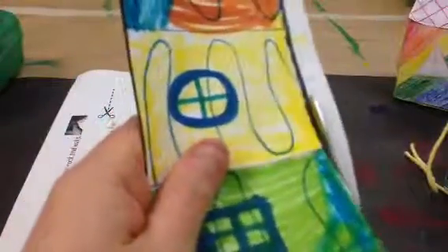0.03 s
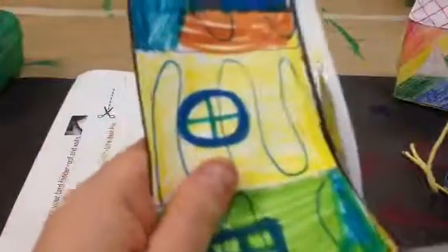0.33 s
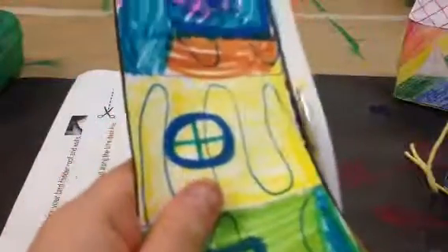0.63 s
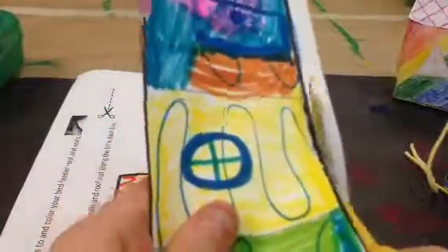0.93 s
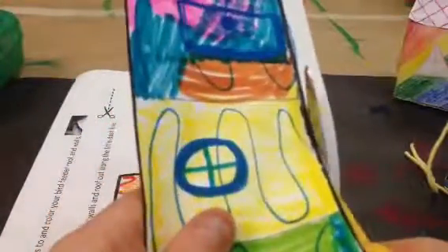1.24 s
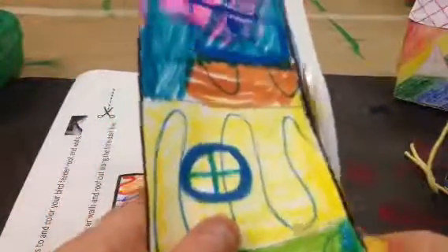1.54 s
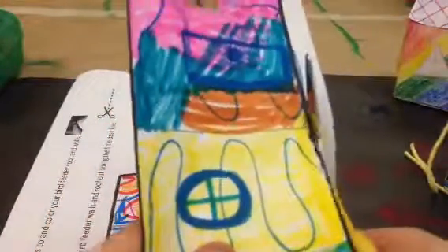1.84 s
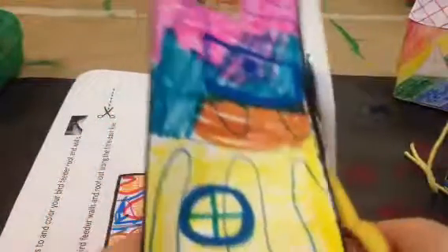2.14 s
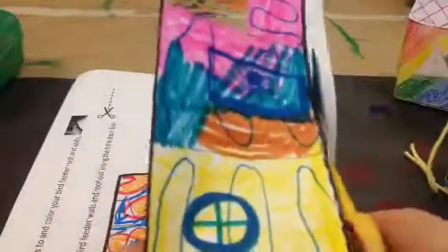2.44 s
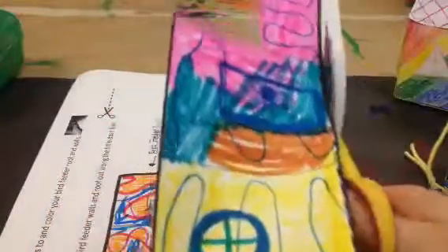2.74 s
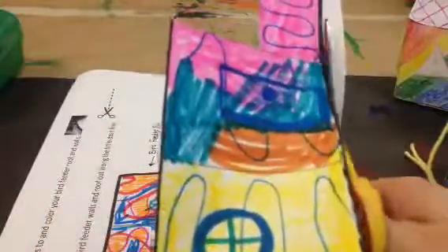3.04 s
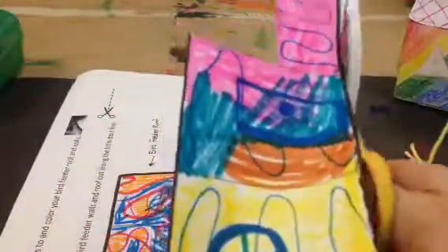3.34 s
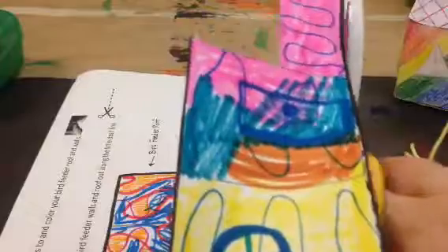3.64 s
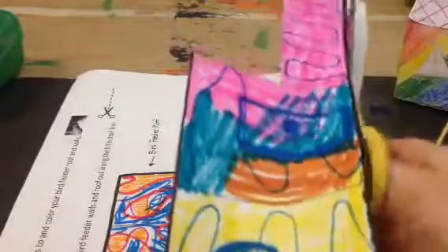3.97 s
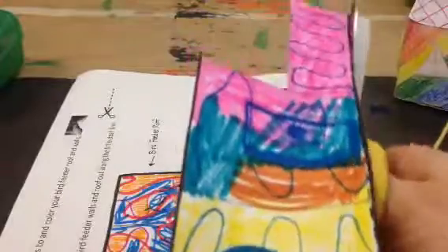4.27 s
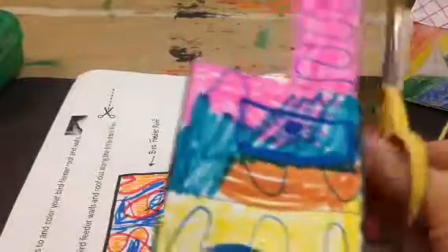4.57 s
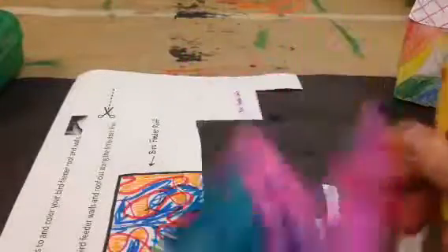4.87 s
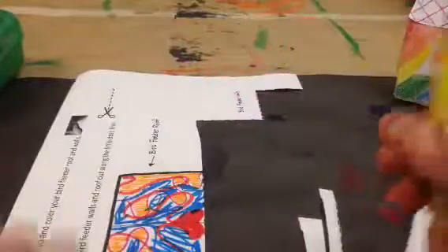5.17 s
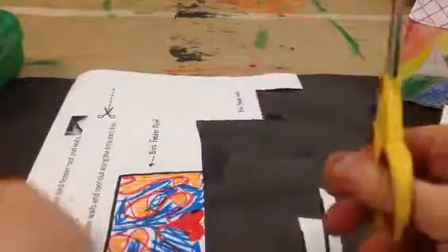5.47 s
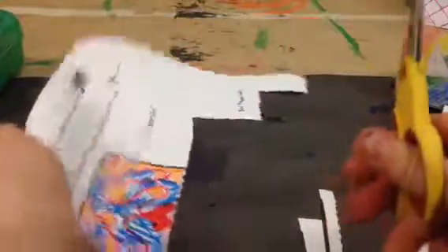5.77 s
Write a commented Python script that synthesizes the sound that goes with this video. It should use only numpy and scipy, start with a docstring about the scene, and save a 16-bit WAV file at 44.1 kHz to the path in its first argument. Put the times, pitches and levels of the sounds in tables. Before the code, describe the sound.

Scissors cut through stiff drawing paper, close by, in a small quiet room with a faint low rumble. The cutting starts immediately. Short, crisp, crunchy bites come at about 0, 0.7, 1.4, 1.9, 2.5, 3.1, 3.7 and 4.3 seconds, many with sharp little snaps as the fibres give way. Between them the blades open and slide along the cut edge with a finer, softer scrape. The sheet ticks and pops as it bends, most clearly around 0.3 and 1.5 seconds. At 4 seconds one blade drags with a brief, high rasp. From about 4.5 seconds the sheet is laid aside with a soft rustle that swells toward 5 seconds, with a few small ticks. A loose edge lightly flicks the table at 5.2 seconds. From 5.6 seconds another sheet is picked up, rustling to the end, with one sharp tick at 5.8 seconds.

```python
"""Scissors cut along a sheet of drawing paper, close by, in a small quiet room.
Each closing stroke breaks a dense run of fibres, and the larger catches let go with a snap.
Between strokes the blades open and slide along the cut edge; the stiff sheet pops and ticks as it bends.
Near 4 seconds one blade drags and rasps. After the last cut the sheet is laid aside with a rustle,
a loose edge flicks the table, and another sheet is picked up."""
import sys
import numpy as np
from scipy import signal
from scipy.fft import rfft, irfft, next_fast_len
from scipy.io import wavfile
from scipy.ndimage import uniform_filter1d, map_coordinates

SR = 44100
rng = np.random.default_rng(int(sys.argv[2]) if len(sys.argv) > 2 else 0)


def int16_out(signal):
    """Quantize to a 16-bit WAV file."""
    q = np.round(np.clip(np.atleast_2d(signal).T, -1, 1) * 32767)
    wavfile.write(sys.argv[1], SR, q.astype(np.int16))


N = 264908  # about 6 seconds

# A sound's "body" is its low part and its "fizz" its highest; stroke() explains swell and arch.
# the blades open and slide: (start [s], length [s], level [dB], swell [dB], arch [dB], body [dB])
SLIDE_STROKES = [(0.245, 0.14, -39, 4, 5, -8.5), (0.454, 0.064, -52, 4, 1, -6),
                 (0.969, 0.15, -44.5, -6, 0.5, -8.5), (1.617, .11, -35, 14.5, 9.5, -10.5),
                 (2.16, 0.17, -46, 10.5, 2.5, -9), (2.735, .13, -41, 13.5, 2.5, -10.5),
                 (3.317, 0.13, -40.5, 13, 8.5, -9.5), (3.497, 0.092, -55.5, 10, 6, -15.5),
                 (3.948, 0.15, -38.5, -7.5, 8.5, -10)]
# the tone of a paper snap: (frequency [Hz], level [dB])
SNAP_TONE = [(88, -58), (150, -23), (462, -21), (1980, -6), (2860, 2), (3550, -3), (4390, 3.5),
             (5870, -14.5), (6730, -26), (7560, -45), (8490, -40.5), (11600, -49), (15500, -67)]


def amp(db):
    """Turn decibels into a number to multiply by."""
    return 10 ** (np.asarray(db) / 20)


def unit(x):
    """Scale a sound to an average strength (rms) of 1."""
    return x / np.sqrt(np.mean(x ** 2) + 1e-20)


def curve_at(points, hz):
    """Read between (frequency, value) points, giving each octave equal room."""
    freqs, values = np.transpose(points)
    return np.interp(np.log(hz + 1), np.log(freqs + 1), values)


def wobble(rate):
    """A smooth curve through `rate` random values a second."""
    values = rng.standard_normal(int(N * rate / SR) + 4)
    return map_coordinates(values, [np.arange(N) * rate / SR])


def filtered(x, response):
    """Multiply each frequency in a sound by response(frequency)."""
    size = next_fast_len(len(x) + SR // 4)
    return irfft(rfft(x, size) * response(np.fft.rfftfreq(size, 1 / SR)), size)[:len(x)]


def impulse(tone, size=2048):
    """The sharpest click that has the given tone."""
    cepstrum = irfft(np.log(amp(curve_at(tone, np.fft.rfftfreq(size, 1 / SR)))))
    # folding the second half onto the first packs the energy at the click's start
    cepstrum[1:size // 2] *= 2
    cepstrum[size // 2 + 1:] = 0
    return irfft(np.exp(rfft(cepstrum)))


def ringing(x, ring_db):
    """The blades and the sheet they grip ring along with a sound."""
    # their resonances: (frequency [Hz], width [Hz], relative level [dB])
    resonances = [(1070, 320, -3.5), (2827, 160, -2), (3380, 62, 2.5), (4400, 330, 0.5)]
    def ring(f):
        return sum(amp(db) * 1j * f * width / (hz * hz - f * f + 1j * f * width)
                   for hz, width, db in resonances)
    return filtered(x, lambda f: 1 + amp(ring_db) * ring(f))


def bands(x):
    """Split a sound into body (below 1600 Hz), crisp middle and fizz (above 7000 Hz)."""
    body = filtered(x, lambda f: 1 / (1 + (f / 1600) ** 8))
    fizz = filtered(x, lambda f: 1 - 1 / (1 + (f / 7000) ** 14))
    return body, x - body - fizz, fizz


def crackle(tone, breaks_per_s, spread_db, hiss, patchy_db, ring_db):
    """Tiny breaks of uneven size and spacing over the hiss of rubbing."""
    count = int(N / SR * breaks_per_s)
    positions = (np.arange(count) + rng.uniform(0, 2, count)) * SR / breaks_per_s
    sizes = amp(spread_db * np.clip(rng.standard_normal(count), -2, 2))
    breaks = np.bincount(positions.astype(int), sizes, N)[:N]
    bursts = signal.lfilter([1], [1, -np.exp(-1 / (SR * 0.00063))], breaks)  # each break fades fast
    grains = unit(bursts * rng.standard_normal(N)) + hiss * rng.standard_normal(N)
    # the bent sheet favours different narrow bands from moment to moment
    spectra = signal.stft(grains, nperseg=512)[2]
    patches = uniform_filter1d(rng.standard_normal(spectra.shape), size=2, axis=0)
    patches = uniform_filter1d(patches, size=10, axis=1)
    grains = signal.istft(spectra * amp(patchy_db * unit(patches)), nperseg=512)[1][:N]
    return ringing(signal.fftconvolve(grains, impulse(tone))[:N], ring_db)


def click(tone, flutter, fade_s, size=4096):
    """A sharp release, then a flutter of the paper that falls 60 dB in fade_s."""
    t = np.arange(size) / SR
    motion = flutter * unit(rng.standard_normal(size) * amp(-60 * t / fade_s)) / np.sqrt(size)
    motion[0] += 1
    return signal.fftconvolve(motion, impulse(tone))[:size]


def add(track, start, sound, db):
    """Mix a sound in at start [s]; db is the level it would have if packed into 4 ms."""
    part = track[max(round(start * SR), 0):][:len(sound)]
    part += amp(db) * sound[:len(part)] * np.sqrt(SR / 250) / np.linalg.norm(sound)


def stroke(start, length, level_db, swell_db, arch_db, attack_s, fade_db_per_s):
    """Gain and progress (0-1) of one stroke: it takes hold, follows the hand's pressure, dies away."""
    t = np.arange(N) / SR - start
    progress = np.clip(t / length, 0, 1)
    # swell is the rise from start to end; arch is how far both ends lie below the middle
    pressure_db = swell_db * (progress - .5) - arch_db * (2 * progress - 1) ** 2
    fade_db = fade_db_per_s * np.maximum(t - length, 0)
    grip = np.clip(t / attack_s, 0, 1) ** 2
    return grip * amp(level_db + pressure_db - fade_db), progress


def background():
    """Low room rumble and faint hiss, there from the start."""
    # the tone of the quiet room: (frequency [Hz], relative level [dB])
    quiet_tone = [(15, -48), (25, -24), (48, -14), (73, -5), (119, -3), (198, -5.5), (300, -12.5),
                  (480, -19.5), (800, -24.5), (1500, -25.5), (2900, -17.5), (4400, -18.5), (7000, -25),
                  (15500, -28.5)]
    return amp(-61.5) * unit(filtered(rng.standard_normal(N), lambda f: amp(curve_at(quiet_tone, f))))


def cutting():
    """The closing blades catch and break fibres in quick uneven clumps."""
    # bites of the blades, one or more to a cut:
    # (start [s], length [s], level [dB], swell [dB], arch [dB], body [dB], fizz [dB])
    bites = [(0, 0.071, -30, 2.5, -1, -12, -27), (0.095, 0.03, -32.5, -2, 3.5, -5, -22),
             (0.633, 0.039, -41, 3, -5.5, -15.5, -21), (0.689, 0.11, -33, 0, 13, -12.5, -14.5),
             (0.802, 0.063, -40.5, 0, 5, -10.5, -14), (1.303, 0.15, -36, -17.5, 5, -10, -17.5),
             (1.448, 0.043, -34, 13.5, -0.5, -13, -29), (1.92, 0.13, -29.5, -2, 0.5, -8.5, -25),
             (2.468, 0.063, -34.5, 5.5, 0.5, -15, -24.5), (2.534, 0.069, -29, -1, 3, -9, -21),
             (2.606, 0.047, -34, 8.5, 6, -9.5, -16), (3.061, 0.14, -31.5, 5, -5.5, -12, -21.5),
             (3.673, .157, -27.5, 4, 16, -13.5, -20.5), (4.296, 0.12, -35.5, -5, -2.5, -12.5, -21.5),
             (4.42, 0.02, -39.5, -2.5, 3.5, 2.5, -22)]
    # the tone of breaking fibres: (frequency [Hz], level [dB])
    fibre_tone = [(60, -33), (150, -21), (430, -18), (620, -12), (850, -8.5), (1100, -6), (1600, -7.5),
                  (2200, -5), (2800, -0.5), (3600, -4), (4500, -1.5), (5300, -6.5), (7200, -16),
                  (15500, -40)]
    fibres = crackle(fibre_tone, breaks_per_s=650, spread_db=4, hiss=0.92, patchy_db=2.5, ring_db=-10.5)
    body, middle, fizz = map(unit, bands(fibres))
    out = np.zeros(N)
    for *shape, body_db, fizz_db in bites:
        gain, progress = stroke(*shape, attack_s=0.013, fade_db_per_s=920)
        growth_db = 4 * (progress - .5)  # the body grows as the bite runs out to the blade tips
        out += gain * (middle + amp(body_db + growth_db) * body + amp(fizz_db) * fizz)
    catching = unit(amp(2.0 * wobble(150)))
    return catching * out


def room_echo(x):
    """The small room answers with a short blurred echo whose high notes die first."""
    # how long the room rings: (frequency [Hz], time to fall 60 dB [s])
    fade_times = [(200, 0.21), (2000, 0.1), (10000, 0.063)]
    hz, t, spectra = signal.stft(rng.standard_normal(SR // 2), SR, nperseg=256)
    fade = amp(-60 * t / curve_at(fade_times, hz)[:, None])
    tail = signal.istft(spectra * fade, SR, nperseg=256)[1]
    delayed_tail = np.pad(tail / np.linalg.norm(tail), (SR // 300, 0))
    return signal.fftconvolve(x, delayed_tail)[:N]


def snapping():
    """Larger catches strain with a short crackle, then let go, each with its own tone."""
    # single snaps of paper and blade: (time [s], relative level [dB], body [dB], relative fizz [dB])
    snaps = [(0.0099, -16.5, -27, -32), (0.0335, -22.5, -11, -32), (0.0962, -21, -24, -25),
             (0.1494, -32, -1, -21), (0.1661, -32.5, 2, -17), (0.179, -34.5, 1.5, -14),
             (0.3424, -23, -8.5, -16), (0.458, -39.5, -14, -9), (0.5186, -31, -18, -12.5),
             (0.5629, -26, -8.5, -16), (0.6521, -26, -22, -15.5), (0.7806, -28.5, -29, -25),
             (0.8208, -32, -11, -4.5), (1.0738, -25.5, -12, -8), (1.0786, -26, -10, -20),
             (1.1025, -30.5, -7, -12), (1.458, -38, -17, -20), (1.586, -43.5, -36, -17),
             (1.7697, -46, -14, -10), (1.8657, -44, -18, -8), (2.5568, -30, -21, -31),
             (2.8744, -29, -16, -38), (2.97, -46.5, -3, -26), (3.0844, -21.5, -11, -23),
             (3.141, -24.5, -14, -17), (3.197, -26.5, -19, -35), (3.409, -31, -19, -32),
             (3.66, -37, -32, -7), (3.671, -34.5, -21, -11), (3.9774, -29.5, 3, -40),
             (4.137, -44.5, -23, -8), (4.207, -45.5, -23, -3), (4.8193, -45.5, -14, -15),
             (4.9179, -36, -14, -18), (4.9402, -34, -32, -28), (4.9991, -39, -8, -14),
             (5.333, -52, -13, -20), (5.5432, -46.5, -5, -30), (5.806, -23, -43, -42)]
    out = np.zeros(N)
    for start, db, body_db, fizz_db in snaps:
        release = ringing(click(SNAP_TONE, flutter=1, fade_s=0.015), ring_db=-14.5)
        body, middle, fizz = map(unit, bands(release))
        add(out, start, middle + amp(body_db) * body + amp(fizz_db + 1.5) * fizz, db - 2.5)
        strain_start = start - rng.uniform(.003, .006)
        add(out, strain_start, click(SNAP_TONE, flutter=3, fade_s=0.0077), db - 17)
    return out


def sliding():
    """Opening blades scrape the cut edge with a finer, softer grain."""
    # the tone of a blade rubbing paper: (frequency [Hz], level [dB])
    rub_tone = [(120, -46.5), (200, -11.5), (385, -16.5), (715, -12.5), (1110, -7.5), (1880, -7),
                (2650, 0.5), (3420, -2), (3750, -1.5), (4500, -2.5), (6240, -13.5), (7220, -24.5),
                (15500, -48.5)]
    rub = crackle(rub_tone, breaks_per_s=1100, spread_db=5, hiss=0.68, patchy_db=4.5, ring_db=-8.5)
    body, middle, fizz = bands(rub)
    body, scrape = unit(body), unit(middle + amp(4.5) * fizz)
    out = np.zeros(N)
    for *shape, body_db in SLIDE_STROKES:
        gain, _ = stroke(*shape, attack_s=0.014, fade_db_per_s=528)
        out += gain * (scrape + amp(body_db) * body)
    return unit(amp(1.63 * wobble(140))) * out


def buckling():
    """The sheet flips its curve: a crinkle, a full pop and a short low thump of the whole sheet."""
    # pops of the sheet: (time [s], level [dB], thump level [dB], thump pitch [Hz])
    pops = [(0.2483, -31.5, -47.5, 220), (0.253, -24, -61, 192), (0.277, -31, -44, 203),
            (0.6354, -27, -55, 262), (1.0567, -31.5, -46.5, 168), (1.4798, -21.5, -34.5, 353),
            (2.3237, -29.5, -53, 180), (4.334, -37, -46, 163)]
    # the tone of a pop: (frequency [Hz], level [dB])
    pop_tone = [(53, -70), (90, -47), (282, -16), (902, 4), (1360, -2.5), (2090, 1.5), (2280, -3),
                (2890, 4.5), (3580, -6), (4540, -1), (6270, -13), (7290, -26), (12200, -30), (15500, -61)]
    out, t = np.zeros(N), np.arange(SR // 8) / SR
    for start, db, thump_db, hz in pops:
        add(out, start, ringing(click(pop_tone, flutter=1, fade_s=0.0095), ring_db=-13), db)
        add(out, start - .0035, click(SNAP_TONE, flutter=3.6, fade_s=0.029), db - 9.5)
        thump = np.sin(2 * np.pi * hz * t) * amp(-60 * t / 0.024)
        thump += 0.34 * np.sin(2 * np.pi * 0.733 * hz * t) * amp(-60 * t / 0.08)
        # a thin sheet gives off almost no deep bass
        bass_cut = signal.butter(2, 1.5 * hz, "high", fs=SR, output="sos")
        add(out, start, signal.sosfilt(bass_cut, thump), thump_db + 5)
    return out


def settling(ticks=3, within_s=0.066):
    """The held sheet settles after each slide with a few small dry ticks."""
    out = np.zeros(N)
    for start, length, *_ in SLIDE_STROKES:
        for _ in range(ticks):
            tick = click(SNAP_TONE, flutter=1, fade_s=0.0067)
            add(out, start + length + within_s * rng.uniform(), tick, db=-53)
    return out


def rasping():
    """One blade sticks and slips on the paper's edge, making a narrow band of noise that wanders."""
    # the course of the rasp: (time [s], level [dB], pitch [Hz])
    course = [(3.979, -48, 2865), (4.01, -33.5, 3105), (4.078, -48, 2950), (4.129, -59.5, 3570),
              (4.22, -67, 3590)]
    t = np.arange(N) / SR
    times, db, hz = np.transpose(course)
    gain = (t >= times[0]) * (t <= times[-1]) * amp(np.interp(t, times, db))
    phase = 2 * np.pi * np.cumsum(np.interp(t, times, hz)) / SR
    roughness = wobble(900) + 1j * wobble(900)  # smears the pure note into noise
    return gain * unit(np.real(roughness * np.exp(1j * phase)))


def rustling():
    """Sheet slips over sheet with a lightly crinkling rustle."""
    # moves of the sheets: (start [s], length [s], level [dB], swell [dB], arch [dB], body [dB])
    moves = [(4.458, 0.508, -67.5, 28.5, -1.5, -13), (4.99, 0.031, -46.5, -4.5, 1, -12.5),
             (5.051, 0.13, -48.5, -4, 5, -7), (5.582, 0.1, -54, 3, 6, -16),
             (5.717, 0.082, -43, 15, 4.5, -23), (5.83, 0.2, -46.5, -9.5, -2.5, -23),
             (5.987, 0.036, -37, 14, -2, -19)]
    # the tone of paper brushing paper: (frequency [Hz], level [dB])
    brush_tone = [(180, -38), (300, -12.5), (1030, -10.5), (1620, -8.5), (2200, -5), (2900, -1),
                  (3570, -9.5), (4400, -2.5), (5400, -8), (6900, -26.5), (15500, -44)]
    brush = crackle(brush_tone, breaks_per_s=550, spread_db=1.5, hiss=1, patchy_db=4.5, ring_db=-19)
    body, middle, fizz = bands(brush)
    body, rustle = unit(body), unit(middle + amp(5.5) * fizz)
    out = np.zeros(N)
    for *shape, body_db in moves:
        gain, _ = stroke(*shape, attack_s=0.018, fade_db_per_s=296)
        out += gain * (rustle + amp(body_db) * body)
    return unit(amp(1.4 * wobble(90))) * out


def flicking():
    """A loose paper edge flicks against the table."""
    # touches of the edge: (time [s], relative level [dB])
    flicks = [(5.213, -35), (5.2257, -41), (5.2345, -37)]
    # the tone of paper hitting the table: (frequency [Hz], level [dB])
    flick_tone = [(120, -52), (200, -24), (312, -8), (1070, -49), (1210, -19), (1640, -10), (2480, 1),
                  (3620, -23), (4680, -13), (6700, -35), (12000, -41), (15600, -69), (22000, -120)]
    out = np.zeros(N)
    for start, db in flicks:
        add(out, start, click(flick_tone, flutter=2, fade_s=0.077), db - .5)
    return out


def scene():
    """Scissors and paper close by, the room far behind."""
    paper = cutting() + snapping() + sliding() + buckling() + settling()
    paper += rasping() + rustling() + flicking()
    return (paper + amp(-22) * room_echo(paper) + background())[None]


def record(dry):
    """Remove the very highest treble, from 15650 Hz up."""
    return filtered(dry[0], lambda f: f < 15650)[None]


dry = scene()
out = record(dry)
int16_out(out)
```